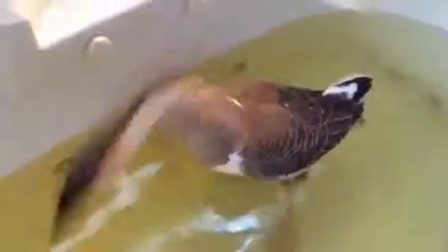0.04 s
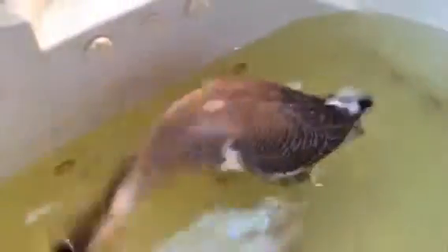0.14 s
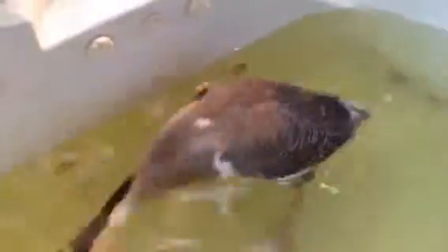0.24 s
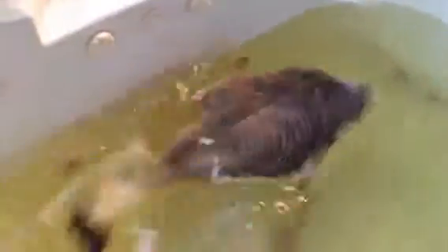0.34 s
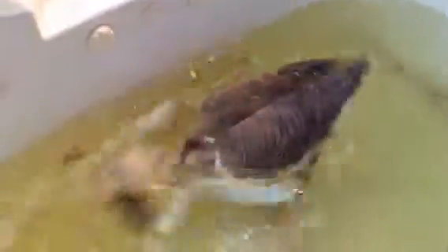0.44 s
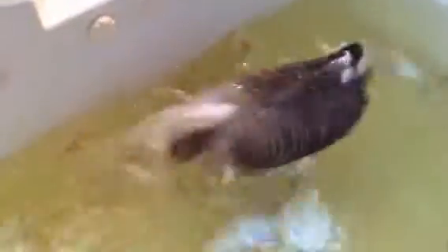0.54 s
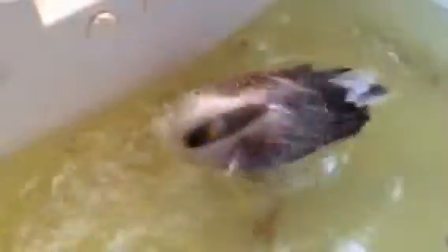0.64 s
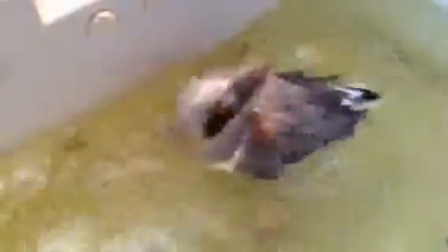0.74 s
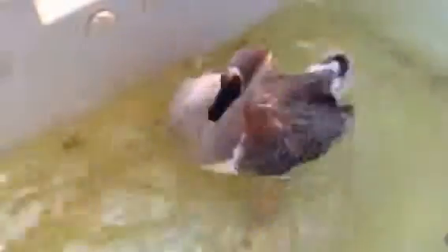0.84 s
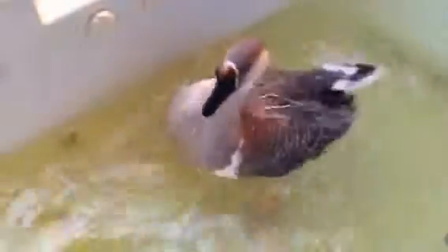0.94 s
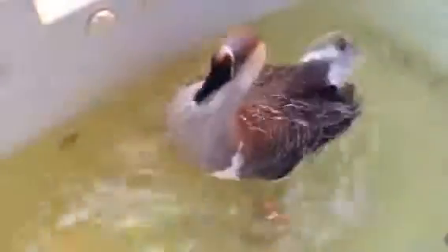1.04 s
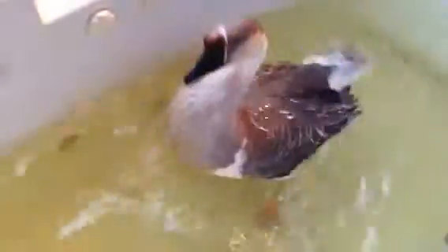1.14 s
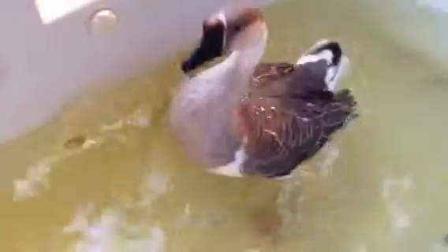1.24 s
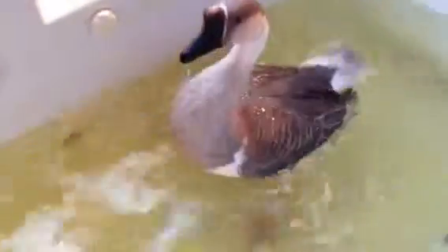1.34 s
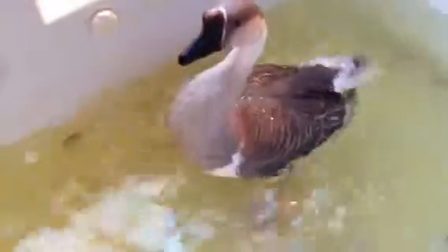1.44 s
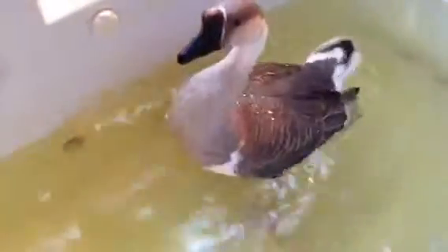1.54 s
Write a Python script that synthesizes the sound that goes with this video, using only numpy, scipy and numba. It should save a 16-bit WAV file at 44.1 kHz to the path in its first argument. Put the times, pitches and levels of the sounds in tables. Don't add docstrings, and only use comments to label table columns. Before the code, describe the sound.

Close splashing of bath water by a goose: a quick plop, then half a second of rough, bubbling splashes peaking early, then thinning to scattered droplets over quiet hiss, with a short bright tiled-room echo.

```python
import sys
import numpy as np
from scipy import signal
from scipy.fft import rfft, irfft
from scipy.io import wavfile
from scipy.ndimage import uniform_filter1d
from numba import njit

SR = 44100
rng = np.random.default_rng(int(sys.argv[2]) if len(sys.argv) > 2 else 0)


def ratio(d):
    e = np.asarray(d, float) / 20
    return 10 ** e


def put_to_file(sound):
    columns = np.atleast_2d(sound).T
    safe = np.clip(columns, -1, 1)
    whole_steps = np.round(safe * 32767)
    wavfile.write(sys.argv[1], SR, whole_steps.astype(np.int16))


N = 70560

# t/s, level/dB, depth of the churning/dB, fineness of the spray/dB
AGITATION = [(0.176, -73, -21, -17), (0.188, -38.5, -6.5, -19), (0.212, -50, 7, -10.5), (.30, -49, -16, -9),
             (0.344, -59, -31, -0.5), (0.387, -40.5, -12, -3.5), (.49, -43, -15, -18.5),
             (0.526, -38, -13, -13), (0.563, -34, -5, -10.5), (.72, -36.5, -14, -12),
             (0.859, -38.5, -16.5, -8.5), (1.021, -47.5, -19, -10), (1.12, -63, -10.5, 1.5),
             (1.24, -66, -15, 2), (1.36, -70.5, -19, 0), (1.6, -76.5, -27, 7.5)]
# t/s, extra level/dB, fade/s
WING_STROKES = [
    (0.384, 9, 0.0075),
    (0.527, 7.5, 0.028),
    (0.564, -6, 0.0045),
    (0.607, 16, 0.015),
    (0.643, 4, 0.0076),
    (0.781, 4.5, 0.028),
    (0.938, 3, 0.1),
]
# f/Hz, level/dB
FOAM_SPECTRUM = [(100, -26.5), (270, -6), (477, -9.5), (850, -2), (1500, -0.5), (2800, 0.5), (5500, -9),
                 (14000, -32.5)]
# t/s, peak level/dB, f/Hz, ring/cycles
LARGE_BUBBLES = [(0.188, -30.5, 1212, 18), (0.205, -18.5, 498, 3.8), (0.359, -35, 2150, 23),
                 (0.439, -32, 1920, 35), (0.477, -31.5, 1080, 12), (0.418, -30, 2100, 26),
                 (0.572, -25, 2260, 44), (0.603, -16, 1010, 7.2), (0.675, -20.5, 1500, 11),
                 (0.754, -29.5, 1500, 43), (0.783, -24, 1510, 15), (0.796, -24, 1380, 33),
                 (0.879, -34, 825, 22), (0.835, -30.5, 1370, 15), (0.893, -29.5, 2060, 22),
                 (1.145, -39, 2310, 12), (1.176, -31.5, 2126, 28), (1.33, -57, 1570, 20),
                 (1.377, -58.5, 2200, 62), (1.492, -47.5, 1665, 48)]
# t/s, peak level/dB, f/Hz, ring/cycles
DROPLETS = [(0.1909, -21.5, 2510, 8), (0.2591, -56, 3330, 10), (0.2975, -22, 4230, 6.2),
            (0.3553, -34, 2550, 14), (0.3658, -31, 4150, 20), (0.3888, -12, 3890, 9), (0.39, -16, 3260, 15),
            (0.392, -21.5, 2340, 16), (0.403, -20.5, 3270, 13), (0.4504, -23.5, 4150, 20),
            (0.48, -38, 2640, 6.9), (0.4976, -22, 3380, 12), (0.5, -19, 4680, 14), (0.532, -17, 4000, 9),
            (0.537, -16, 3200, 17), (0.62, -19, 2290, 21), (0.647, -18.5, 2050, 12.6),
            (0.75, -16, 3650, 10), (0.94, -24, 2620, 23), (0.94, -28, 3350, 27), (1.0732, -37, 2550, 8.1),
            (1.1396, -65, 2840, 9.2), (1.163, -34, 5370, 11), (1.1775, -28.5, 2720, 6.5),
            (1.178, -42, 3530, 9), (1.187, -26.5, 2520, 13.6), (1.2045, -25, 2940, 9),
            (1.207, -32, 3740, 9), (1.24, -36, 2040, 9), (1.2416, -38, 3500, 15), (1.25, -45, 2100, 12),
            (1.264, -41, 2600, 14), (1.284, -41, 3000, 14), (1.3022, -38, 4700, 15),
            (1.4492, -26.5, 4920, 19.5), (1.4917, -33.5, 2760, 9.3), (1.493, -36, 2060, 9.8),
            (1.5219, -33.5, 3340, 8.4)]
# t/s, peak level/dB, f/Hz, ring/cycles, glide/share of pitch
FAINT_BUBBLES = [(0.206, -23.5, 937, 7.6, 0.25), (.782, -32, 593, 11.3, 0.079),
                 (0.35, -36.5, 3320, 25, 0.16), (1.3, -45.5, 2900, 39, 0.037), (0.224, -45, 310, 5.6, .2),
                 (0.261, -35, 308, 6.7, 0.081), (0.753, -42.5, 296, 14, 0.11),
                 (1.3, -42.5, 2156, 10, 0.029), (1.389, -49.5, 4500, 38, 0.023),
                 (0.785, -24.5, 2720, 30, 0.033), (.818, -27.5, 5200, 47, 0.097),
                 (1.6, -43, 1545, 92, 0.0033)]
# t/s, peak level/dB, T60/s
SPRAY_SLAPS = [(0.1846, -33, 0.053), (0.2431, -58, 0.033), (0.2604, -25.5, 0.019), (0.295, -30.5, 0.075),
               (0.3654, -34, 0.04), (0.383, -35, 0.043), (0.39, -44, 0.026), (0.495, -34.5, 0.14),
               (0.531, -29, 0.02), (0.5614, -44, 0.04), (0.5893, -23, 0.066), (0.622, -5.5, 0.013),
               (0.755, -36, 0.15), (0.804, -32, 0.079), (0.8477, -18.5, 0.012), (0.9061, -47, 0.036),
               (1.008, -32.5, 0.055), (1.141, -45.5, 0.068), (1.161, -39, 0.054), (1.345, -53.5, 0.035),
               (1.4484, -50.5, 0.063), (1.489, -48, 0.072)]
# t/s, peak level/dB, f/Hz
DROP_IMPACTS = [(.2432, -40, 11000), (.2621, -36, 13300), (0.296, -20, 5800), (.5884, -14, 12500),
                (.6122, -13, 3620), (.618, -22, 4560), (.6228, -14, 8300), (0.63, -15, 3330),
                (.763, -25, 7900), (.8049, -25, 12800), (0.8498, -20.5, 8400), (.918, -40, 13000),
                (.996, -34, 12000), (1.1779, -27, 3400), (1.214, -46, 13500), (1.2548, -39, 12800),
                (1.3457, -40, 13000), (1.4917, -35, 3600)]
# t/s, length/s, rms level/dB, first f/Hz, last f/Hz
AIR_POCKETS = [(.381, .035, -47, 530, 560), (.392, .04, -50, 1180, 1200), (.412, .075, -50, 590, 1000),
               (.443, .022, -44, 1090, 1100), (.49, .022, -45, 1150, 1200), (.495, .018, -44, 1580, 1600),
               (.528, .022, -33, 1980, 2030), (.551, .02, -35, 2550, 2700), (.679, .018, -43, 1550, 2050),
               (.782, .028, -40, 950, 900), (.784, .028, -40, 620, 780), (.91, .07, -50, 880, 860),
               (.92, .035, -44, 2130, 2080), (.933, .018, -33, 1290, 1310), (1.003, .05, -42, 1000, 940),
               (1.004, .06, -45, 1850, 1900), (1.076, .04, -55, 2440, 2540), (1.179, .018, -45, 2030, 2150),
               (1.2, .06, -62, 1750, 1800)]
# delay/s, level/dB
TUB_ECHOES = [
    (.002, -18),
    (.0045, -19.5),
    (.0068, -15),
]
# f/Hz, level/dB
HISS_SPECTRUM = [(18, -49), (30, -8.5), (230, -5.5), (270, -4.5), (432, -8), (1140, -20.5), (1510, -14),
                 (10200, -18.5), (15500, -17)]

TOP_HZ = 15200
BUBBLE_GLIDE, BUBBLE_ONSET_CYCLES = 0.029, 0.19


@njit
def ring(n, sr, start, hz, cycles, glide, size, onset):
    out = np.zeros(n)
    for k in range(len(start)):
        span = cycles[k] / hz[k] * sr
        phasor, lack = size[k] + 0j, 1.
        turn = np.exp(2j * np.pi * hz[k] / sr - np.log(1000.) / span)
        bend = np.exp(2j * np.pi * hz[k] / sr * glide[k] / span)
        fill = np.exp(-hz[k] / sr / onset)
        first = int(start[k] * sr)
        for j in range(max(first, 0), min(n, first + int(span))):
            out[j] += phasor.imag * (1 - lack) ** 2
            phasor *= turn
            turn *= bend
            lack *= fill
    return out


def colour(hz, table):
    table = np.array(table)
    return np.interp(np.log(np.maximum(hz, 1)), np.log(table[:, 0]), table[:, 1])


def agitation(t, hz):
    deep_hz, deep_octaves, rise_s = 960, 0.93, 0.0039
    s, db, deep, fine = np.array(AGITATION, float).T
    low = np.clip(np.log2(deep_hz / hz) / deep_octaves, 0, 1)
    high = np.clip(np.log2(hz / 4000), 0, 1)
    level = np.interp(t, s, db, left=-90)
    for at, extra, fade in WING_STROKES:
        rise = np.clip((t - at) / rise_s, 0, 1)
        level = level + extra * rise * np.exp(-np.maximum(t - at, 0) / fade)
    return level + low * (np.interp(t, s, deep) + 14) + high * (np.interp(t, s, fine) + 12)


def swarm(count, low_hz, high_hz, cycles, scatter_db, db):
    small_bias, loudest, glide, onset_cycles = .75, 1.7, 0.35, 0.45
    u = rng.random((count, 5)).T
    t = u[0] * N / SR
    hz = low_hz * (high_hz / low_hz) ** u[1] ** small_bias
    scatter = scatter_db * np.minimum(-np.log(u[2]), loudest)
    level = agitation(t, hz) + colour(hz, FOAM_SPECTRUM) + 10 * np.log10(hz / 1000) + scatter + db
    size = ratio(level) * np.sqrt(hz / 1000)
    lasting = np.maximum(cycles, 1) * (0.83 + 1.73 * u[3])
    return ring(N, 1. * SR, t, hz, lasting, glide * 2 * u[4], size, onset_cycles)


def gulps():
    return swarm(count=500, low_hz=86, high_hz=960, cycles=5.4, scatter_db=2.5, db=-22.0)


def foam():
    middling = swarm(count=2600, low_hz=493.6, high_hz=5490, cycles=25.7, scatter_db=2, db=-6.5)
    tiny = swarm(count=2500, low_hz=4550, high_hz=13350, cycles=8.1, scatter_db=3.5, db=-1.5)
    return middling + tiny


def shaped(x, table):
    hz = np.arange(N // 2 + 1) * SR / N
    y = irfft(rfft(x) * ratio(colour(hz, table)), N)
    return y / np.std(y)


def wash():
    t = np.arange(N) / SR
    noise = shaped(rng.standard_normal(N), FOAM_SPECTRUM)
    out = 0
    for edge_hz, kind, centre_hz in ((725, "low", 500), ([700, 5500], "bandpass", 2000), (5100, "high", 8000)):
        layer = signal.sosfilt(signal.butter(2, edge_hz, kind, fs=SR, output="sos"), noise)
        out = out + layer * ratio(agitation(t, centre_hz) - 2.5)
    return out


def singles(table, glide, onset_cycles, fewest_cycles):
    t, db, hz, cycles = np.array(table, float).T[:4]
    lasting = 2 * np.maximum(cycles, fewest_cycles)
    return ring(N, 1. * SR, t, hz, lasting, glide + 0 * t, ratio(db), onset_cycles)


def lone_bubbles():
    large = singles(LARGE_BUBBLES, BUBBLE_GLIDE, BUBBLE_ONSET_CYCLES, 2)
    droplets = singles(DROPLETS, BUBBLE_GLIDE, 1.2, 11)
    faint = singles(FAINT_BUBBLES, np.array(FAINT_BUBBLES)[:, 4], BUBBLE_ONSET_CYCLES, 2)
    return large + droplets + faint


def slaps():
    centre_hz, octaves, rise_s = 5740, 1.1, .004
    t, shape = np.arange(N) / SR, 0
    for s, db, t60 in SPRAY_SLAPS:
        rise = np.clip((t - s) / rise_s, 0, 1)
        fall = ratio(-60 * np.clip((t - s) / max(t60, .004), 0, 3))
        shape = shape + ratio(db - 4.5) * rise * fall
    edges = [centre_hz / 2 ** octaves, min(centre_hz * 2 ** octaves, TOP_HZ)]
    band = signal.butter(1, edges, "bandpass", fs=SR, output="sos")
    return shape * signal.sosfilt(band, rng.standard_normal(N))


def ticks():
    cycles, onset_cycles = 22, .8
    t, db, hz = np.array(DROP_IMPACTS, float).T
    return ring(N, 1. * SR, t, hz, cycles + 0 * t, 0 * t, ratio(db), onset_cycles)


def air_pockets():
    rise_s, fall_s, sag_db, flutter_depth = .003, .006, -3, 10
    t, out = np.arange(N) / SR, 0
    flutter = 1 + flutter_depth * uniform_filter1d(rng.standard_normal(N), size=400)
    for s, length, db, first_hz, last_hz in AIR_POCKETS:
        share = np.clip((t - s) / length, 0, 1)
        edge = np.clip(np.minimum((t - s) / rise_s, (s + length - t) / fall_s), 0, 1)
        pitch = first_hz + (last_hz - first_hz) * share
        note = np.sin(2 * np.pi * np.cumsum(pitch) / SR)
        out = out + edge * ratio(db + sag_db * share) * note
    return out * flutter * np.sqrt(2)


def room(x):
    low_t60_s, high_t60_s, tail_db, delay_s = .3, .24, -8, 0.003
    t = np.arange(SR // 2) / SR
    noise = rng.standard_normal(len(t))
    low = signal.sosfilt(signal.butter(1, 3000, fs=SR, output="sos"), noise)
    tail = low * ratio(-60 * t / low_t60_s) + (noise - low) * ratio(-60 * t / high_t60_s)
    tail *= np.clip(t / delay_s, 0, 1)
    tail *= ratio(tail_db) / np.sqrt(np.sum(tail ** 2))
    tail[0] = 1
    for s, db in TUB_ECHOES:
        tail[int(s * SR)] += ratio(db)
    return signal.fftconvolve(x, tail)[:N]


def hiss():
    return ratio(-65.5) * shaped(rng.standard_normal(N), HISS_SPECTRUM)


def scene():
    water = gulps() + foam() + wash() + lone_bubbles() + slaps() + ticks() + air_pockets()
    return (room(water) + hiss())[None]


def low_pass(x):
    return signal.sosfilt(signal.butter(12, 15730, fs=SR, output="sos"), x)


def record(dry):
    dry = signal.sosfilt(signal.butter(2, 113, "high", fs=SR, output="sos"), dry)
    dry = signal.sosfilt(signal.ellip(8, .2, 70, TOP_HZ, fs=SR, output="sos"), dry)
    return low_pass(dry)


dry = scene()
out = record(dry)
put_to_file(out)
```